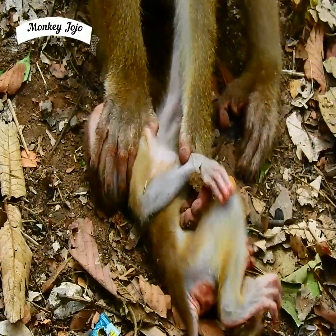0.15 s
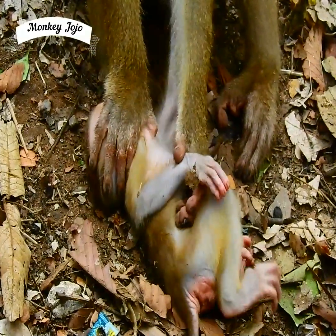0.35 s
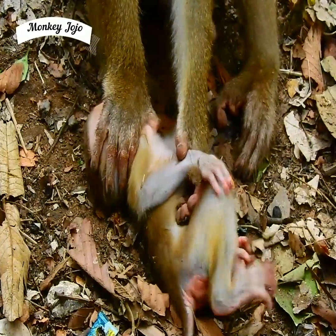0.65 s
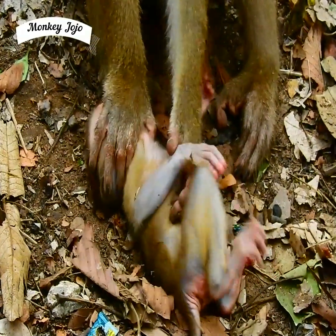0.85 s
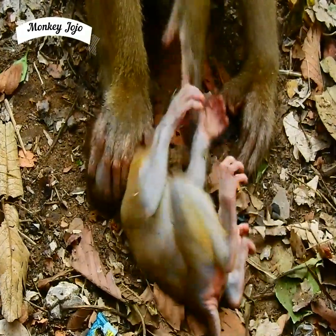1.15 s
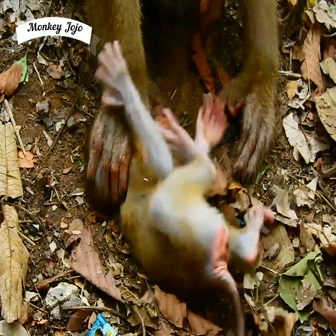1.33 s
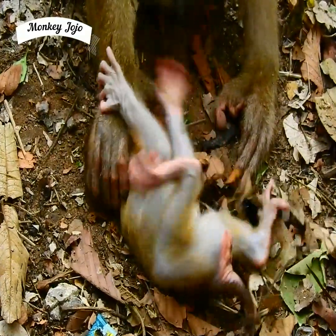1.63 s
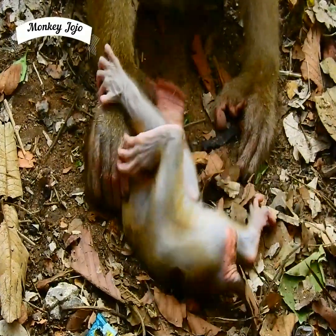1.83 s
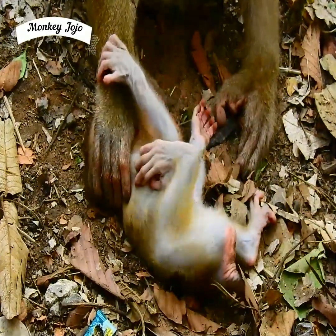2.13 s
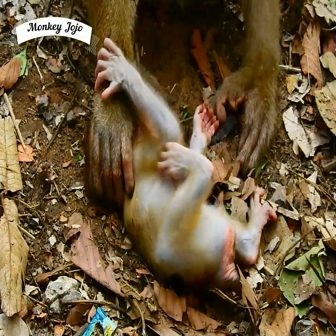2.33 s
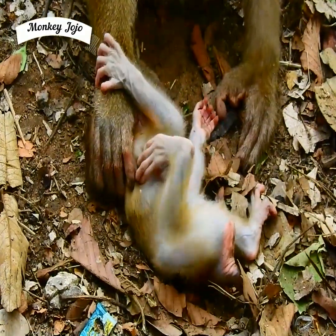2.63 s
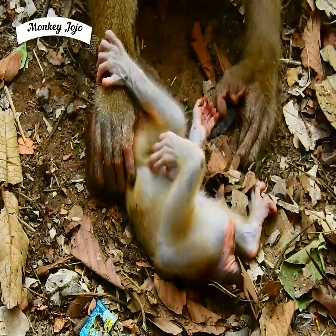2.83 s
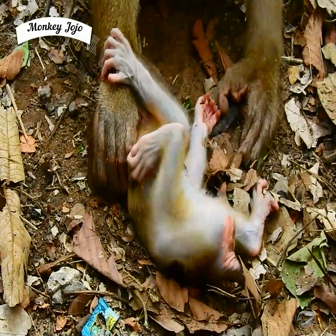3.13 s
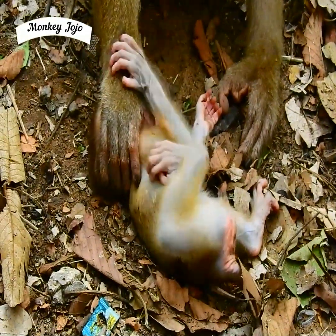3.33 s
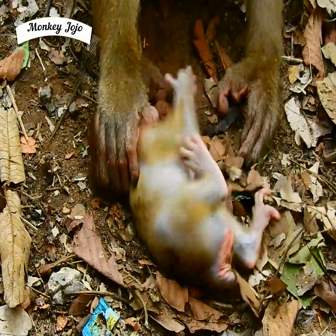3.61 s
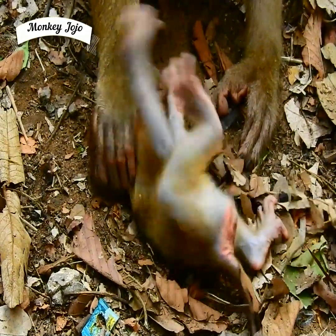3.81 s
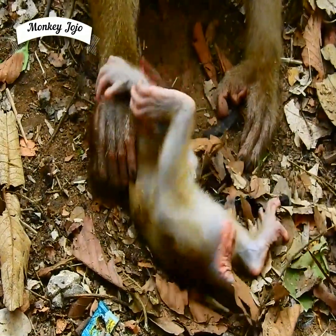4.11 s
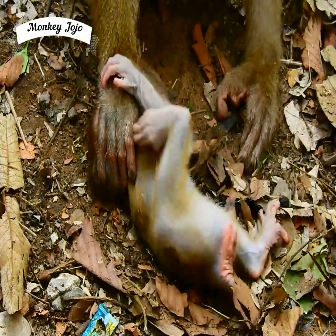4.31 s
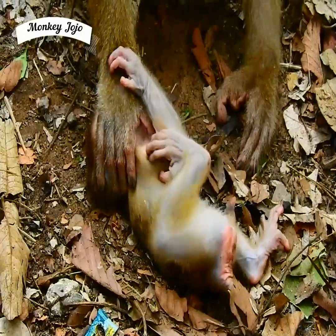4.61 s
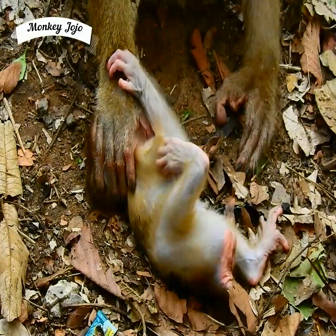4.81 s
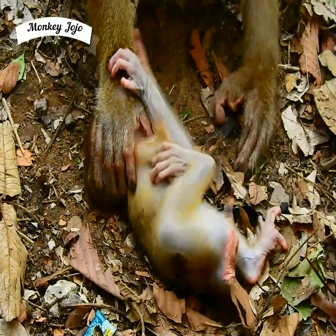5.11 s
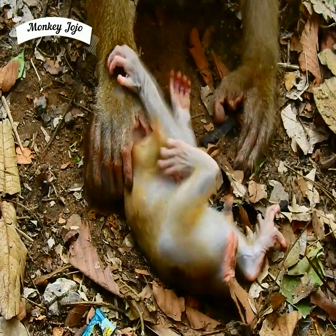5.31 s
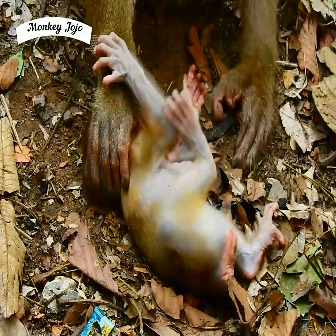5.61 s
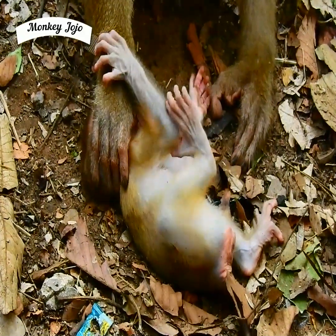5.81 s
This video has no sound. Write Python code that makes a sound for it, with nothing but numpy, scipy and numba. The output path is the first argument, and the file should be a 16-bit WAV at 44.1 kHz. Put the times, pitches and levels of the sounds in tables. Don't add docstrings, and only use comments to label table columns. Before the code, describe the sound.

A young monkey close by shrieks in ragged, piercing bursts that thin into wavering whistles, over low rumble and insect hiss outdoors.

```python
import sys
import numpy as np
from scipy import signal
from scipy.fft import rfft, irfft, next_fast_len
from scipy.io import wavfile
from scipy.ndimage import uniform_filter1d, minimum_filter1d, map_coordinates
from numba import njit

SR = 44100
rng = np.random.default_rng(int(sys.argv[2]) if len(sys.argv) > 2 else 0)


def master(y):
    cut = np.clip(np.atleast_2d(y).T, -1, 1)
    pcm = np.round(cut * 32767)
    wavfile.write(sys.argv[1], SR, pcm.astype(np.int16))


def boost(x):
    u = np.asarray(x, float) / 20
    return 10 ** u


N = 262395
T = np.arange(N) / SR


def unit(x):
    return x / np.sqrt(np.mean(x ** 2) + 1e-20)


def along(points, hz):
    f, v = np.transpose(points)
    return np.interp(np.log(hz + 1), np.log(f + 1), v)


def turns(hz):
    return 2 * np.pi * np.cumsum(hz) / SR


def wobble(rate):
    coarse = T[::16]
    knots = rng.standard_normal(int(N * rate / SR) + 4)
    return np.interp(T, coarse, map_coordinates(knots, [coarse * rate]))


def calls(tables, fade, lead=0, rise=0.0018):
    early = [np.vstack([[c[0][0] - lead - 1e-3, *c[0][1:]], c]) for c in tables]
    s, *cols = np.transpose(np.vstack(early))
    gate = 0
    for c in early:
        opening = (T - c[0][0]) / rise
        closing = (c[-1][0] - T) / fade
        gate = gate + np.clip(np.minimum(opening, closing) + 1, 0, 1)
    return [np.minimum(gate, 1)] + [uniform_filter1d(np.interp(T, s, c), size=110) for c in cols]


def filtered(x, response):
    m = next_fast_len(N + SR // 2)
    return irfft(rfft(x, m) * response(np.fft.rfftfreq(m, 1 / SR)), m)[..., :N]


def resonant(x, modes, order=2):
    def tube(f):
        total = 0
        for k, (centre, width, db) in enumerate(modes):
            band = 1j * f * width
            total = total + (-1) ** k * boost(db / order) * band / (centre * centre - f * f + band)
        return total
    return unit(filtered(x, lambda f: tube(f) ** order))


@njit
def moving(x, hz, width_hz, rate):
    y = np.zeros(len(x))
    r = np.exp(-np.pi * width_hz / rate)
    for i in range(2, len(x)):
        y[i] = x[i] - x[i - 2] + 2 * r * np.cos(2 * np.pi * hz[i] / rate) * y[i - 1] - r * r * y[i - 2]
    return y


def cavity(x, hz, width_hz):
    return unit(moving(moving(x, hz, width_hz, SR), hz, width_hz, SR))


# t/s, pulse rate f/Hz, level/dB of lowest partials, firmness 0-1
LOCKED = [
    [(1.33, 810, -50, .4), (1.385, 870, -50, .4)],
    [(1.675, 880, -48, .4), (1.71, 930, -44, .65), (1.73, 955, -42, .9), (1.755, 960, -44, .85)],
    [(1.82, 930, -52, .4), (1.865, 850, -46, .55)],
    [(4.14, 720, -58, .45), (4.165, 805, -54, .8), (4.19, 880, -54, .75)],
    [(4.27, 1640, -65, .6), (4.3, 1140, -65, .5), (4.33, 780, -65, .4)],
    [(5.345, 1090, -37, .8), (5.37, 1110, -33, .8), (5.39, 1100, -36, .7)],
    [(5.705, 880, -42, .5), (5.73, 810, -52, .45), (5.75, 1090, -65, .6), (5.78, 1130, -65, .4)],
]


def folds():
    gate, lock_hz, buzz_db, firm = calls(LOCKED, fade=0.00824)
    loose = 1 - gate * firm
    stagger = loose ** 2 * (.1 * wobble(300) + .16 * wobble(45)) + .012 * wobble(60)
    beat = turns(lock_hz * np.exp(stagger))
    slap = np.exp(16 * (np.cos(beat) - 1)) * boost(loose * 2.0 * wobble(500))
    hiss = rng.standard_normal(N) * (.5 + np.sqrt(slap))
    partials = np.sin(beat) + .5 * np.sin(2 * beat) + 0.2 * np.sin(3 * beat)
    buzz = gate * boost(buzz_db + 3.2 * wobble(60)) * partials
    source = unit(np.diff(slap, prepend=0)) + .42 * loose * unit(hiss)
    return source, (1 - loose) * np.cos(beat), buzz


def flicker(hz, beat):
    phase = turns(hz * (1 + .035 * wobble(45) + .018 * wobble(500))) + .7 * beat
    catch = np.clip(wobble(40) + .35, .05, 1.6)
    return unit(catch * np.sin(phase)), unit(catch ** 2 * np.sin(2 * phase))


MOUTH_HZ, MOUTH_WANDERS = 6450, .035
MOUTH_HOLDS, MOUTH_CLOSES_DB = 0.57, 6
THROAT_TIGHT_HZ, TIGHTEN_S, THROAT_SAG_DB_PER_S = 4680, 0.059, 24
THROAT_LASTS_S, THROAT_DIES_DB_PER_S, THROAT_BURST_DB = 0.12, 300, 4
TOP_DB, TOP_BURST_DB, BURST_S, TOP_GROWS_DB_PER_S = -21.5, 5, 0.016, 39


def shape(s, length, mouth_db, throat_db, throat_hz):
    age = np.linspace(0, length, num=12)
    burst = np.exp(-age / BURST_S)
    closing = np.clip(age / length - MOUTH_HOLDS, 0, 1) / (1 - MOUTH_HOLDS)
    mouth = mouth_db - MOUTH_CLOSES_DB * closing
    throat = throat_db + THROAT_BURST_DB * burst - THROAT_SAG_DB_PER_S * age
    throat = throat - THROAT_DIES_DB_PER_S * np.maximum(age - THROAT_LASTS_S, 0)
    top = TOP_DB + TOP_BURST_DB * burst + TOP_GROWS_DB_PER_S * age
    hz = THROAT_TIGHT_HZ + (throat_hz - THROAT_TIGHT_HZ) * np.exp(-(age / TIGHTEN_S) ** 2)
    mouth_hz = MOUTH_HZ * (1 + MOUTH_WANDERS * rng.standard_normal(len(age)))
    return np.transpose([s + age, mouth, throat - mouth, top, hz, mouth_hz])


# t/s, length/s, mouth level/dB, throat level/dB, throat resonance at the start f/Hz
SCREECHES = [(0.0, .008, -26, -35.5, 4600), (0.168, 0.04, -16, -25, 3300), (0.259, 0.018, -10, -18, 4270),
             (0.443, 0.036, -21.5, -24, 4100), (0.514, .022, -10.5, -16, 4086),
             (0.711, 0.054, -12.5, -17.5, 3500), (0.769, 0.084, -7, -15.5, 3565),
             (0.988, 0.15, -9, -12.5, 3570), (1.279, 0.16, -7.5, -11, 3744),
             (1.459, 0.044, -13.5, -19.5, 4900), (1.623, 0.25, -9.5, -13.5, 3206),
             (3.11, .055, -33.5, -57, 3500), (3.315, .04, -14, -22.5, 2900), (3.398, .01, -21.5, -37, 5000),
             (3.546, 0.02755, -14, -18, 2908), (3.615, .05, -8, -15.5, 4000),
             (3.807, 0.14, -7, -13.5, 3100), (4.073, 0.14, -5.5, -12, 3285), (5.168, 0.043, -54, -52, 2800),
             (5.378, 0.1227, -24, -33.5, 3970), (5.712, .04, -6.5, -49, 5000),
             (5.762, 0.037, -40, -20.5, 4900), (5.916, .031, -30, -47, 4500)]
# f/Hz, width/Hz, level/dB
MOUTH = [(5500, 1100, -4), (6450, 800, 0), (7600, 900, -4)]
# f/Hz, width/Hz, level/dB
TOP = [(9000, 3000, 0), (12500, 4000, -12)]


def screech(source, beat):
    shapes = [shape(*row) for row in SCREECHES]
    mouth_open = calls(shapes, fade=0.013, lead=0, rise=.0045)[0]
    voiced, mouth_db, throat_db, top_db, throat_hz, mouth_hz = calls(shapes, fade=0.0093, lead=.009, rise=.009)
    shut = uniform_filter1d(1. * (voiced > 0) - mouth_open, size=500, origin=-240)
    throat_hz = throat_hz * (1 - .2 * shut)
    low_tone, low_octave = flicker(throat_hz, beat)
    high_tone, high_octave = flicker(mouth_hz, beat)
    ringing = cavity(source, throat_hz, width_hz=2000)
    ringing = cavity(ringing, throat_hz * (1 + .06 * wobble(60)), width_hz=1700)
    throat = .9 * ringing + .35 * low_tone
    mouth = .8 * resonant(source, MOUTH) + .5 * high_tone
    top = .85 * resonant(source, TOP) + .4 * low_octave + .06 * high_octave

    def patch():
        return boost(2.6 * wobble(50) + 2.2 * wobble(130))
    upper = mouth_open * (patch() * mouth + boost(top_db) * patch() * top)
    lower = voiced ** 2 * boost(throat_db - 2 + 1.83 * shut) * patch() * throat
    return boost(mouth_db - 3.5) * (upper + lower)


# octave level/dB re the tone, then points
# of t/s, pitch f/Hz, level/dB
WHISTLES = [
    (-19, [(1.89, 6800, -11), (1.9, 6810, -15), (1.955, 6700, -14), (1.97, 6330, -13), (2.035, 6130, -14), (2.085, 6010, -14), (2.165, 5705, -20.5), (2.275, 5480, -17.5), (2.335, 5760, -16)]),
    (-21, [(4.2, 5790, -8), (4.23, 5350, -15.5), (4.254, 6160, -8.5), (4.337, 6110, -14.5), (4.371, 5280, -18.5), (4.485, 5380, -16), (4.517, 5900, -14.5), (4.597, 5870, -13.5), (4.645, 5330, -15.5)]),
    (-15, [(5.575, 5415, -11.5), (5.611, 5320, -18.5), (5.635, 6140, -13), (5.685, 6130, -18.5), (5.705, 6600, -10)]),
            (-28, [(1.035, 4900, -12.5), (1.052, 5700, -25), (1.057, 6600, -15)]),
    (-22, [(2.343, 6200, -39), (2.353, 6450, -8.5), (2.365, 6350, -26)]),
    (-24.5, [(1.066, 3950, -17.5), (1.12, 4276, -18), (1.14, 5160, -12), (1.163, 4890, -18.5)]),
    (-34, [(1.4, 5450, -20), (1.414, 4823, -13.5), (1.432, 6502, -13), (1.5, 4376, -14)]),
    (-45, [(1.8, 7120, -12.5), (1.87, 7250, -14)]),
    (-36, [(3.925, 4200, -15.5), (3.955, 4350, -14)]),
    (-27, [(4.65, 5250, -5.5), (4.662, 4650, -30)]),
    (-27, [(5.71, 6610, -7), (5.769, 5020, -18), (5.8, 5130, -17.5)]),
    (-43, [(5.354, 6360, -32.5), (5.385, 6980, -22)]),
    (-12, [(5.435, 1950, -38.5), (5.485, 2475, -30.5), (5.52, 3857, -15.5), (5.546, 4000, -15), (5.57, 5000, -15.5)]),
]
# t/s, rise f/Hz, fall time/s
JOLTS = [
    (2.003, 250, .02),
    (2.07, 350, .008),
    (2.105, 280, .03),
    (2.25, 350, .012),
    (2.3, 250, .015),
    (4.258, 680, .02),
    (4.435, 1050, .014),
    (4.517, 520, .03),
]
JOLT_RISE_S, JOLT_DB_PER_KHZ = .018, 5
OCTAVE_DB_PER_KHZ = -6.5


def sung():
    tables = [[(*row, octave_db) for row in c] for octave_db, c in WHISTLES]
    tables = sorted(tables, key=lambda c: c[0][0])
    gate, hz, db, octave_db = calls(tables, fade=0.0076)
    jolt = 0
    for s, up, fall in JOLTS:
        rise = np.clip(1 + (T - s) / JOLT_RISE_S, 0, 1)
        jolt = jolt + up * rise * np.exp(-np.maximum(T - s, 0) / fall)
    hz = hz + uniform_filter1d(jolt, size=110)
    db = db + JOLT_DB_PER_KHZ * jolt / 1000
    octave_db = db + octave_db + OCTAVE_DB_PER_KHZ * (hz - 5800) / 1000 + 4 * wobble(30)
    return gate, hz, db, octave_db


def whistle(beat):
    gate, hz, db, octave_db = sung()
    rough = 0.00365 + 0.01104 * (hz < 4800)
    phase = turns(hz * (1 + 0.01048 * wobble(55) + rough * wobble(300))) + 0.32 * beat
    tone = boost(db) * np.sin(phase)
    half_step = boost(db - 45 + 8 * wobble(30)) * np.sin(1.5 * phase)
    third = .07 * np.clip((4400 - hz) / 2000, 0, 1) * np.sin(3 * phase)
    overtones = boost(octave_db) * (np.sin(2 * phase) + third)
    air = rng.standard_normal(N)
    breath = cavity(air, hz, width_hz=2250) + 0.35 * cavity(air, 2.07 * hz, width_hz=1100)
    breath = boost(db - 21.5 + 2.1 * wobble(25.32)) * breath
    return gate * boost(2.2 * wobble(60)) * (np.sqrt(2) * (tone + half_step + overtones) + breath)


# t/s, peak level/dB, resonance f/Hz, length/s, voice 0-1 (full at .7)
GRUNTS = [(0.046, -36, 920, 0.033, 0.06), (0.169, -28.5, 1576, 0.037, 0.061), (0.342, -33, 729, 0.09, 0.18),
          (0.428, -28, 1490, 0.053, 0.056), (0.709, -28.5, 1427, 0.031, 0.17),
          (1.225, -33, 1068, 0.03, 0.17), (2.63, -35.5, 1276, 0.029, 0.86), (2.898, -35, 1133, 0.052, 0.89),
          (2.975, -44, 618, 0.03, 0.64), (3.096, -35, 1458, 0.049, 0.62), (3.291, -27, 1290, 0.054, 0.11),
          (3.536, -28, 1335, 0.041, 0.078), (3.63, -35, 876, 0.029, 0.37),
          (3.797, -33.5, 1524, 0.052, 0.15), (4.09, -34, 1284, 0.035, 0.13), (5.14, -29.5, 956, 0.04, 0.18),
          (5.179, -30.5, 945, 0.024, 0.22), (5.38, -28.5, 1366, 0.042, 0.17)]


def grunts():
    out = np.zeros(N + SR)
    t = np.arange(SR // 8) / SR
    for s, db, hz, length, voice in GRUNTS:
        swell = np.sin(np.pi * np.clip(t / length, 0, 1)) ** 1.06
        air = rng.standard_normal(len(t))
        hum = np.clip(voice, 0, .7) * np.cos(2 * np.pi * hz * t * (1 - 3.58 * t))
        low = signal.lfilter(*signal.iirpeak(hz, 3.5, SR), air + hum)
        wide = signal.lfilter(*signal.butter(2, [750, 3600], "band", fs=SR), air)
        puff = signal.lfilter(*signal.butter(3, 3800, fs=SR), 1.3 * low + .45 * wide)
        out[round(s * SR):][:len(t)] += boost(db + 8) * swell * puff
    return out[:N]


# t/s, second partial f/Hz, level/dB
COO = [
    (3.36, 1617, -30.5),
    (3.44, 1667, -43),
    (3.5, 1710, -29.5),
    (3.68, 1754, -44),
    (3.85, 1880, -32),
]


def coo():
    gate, hz, db = calls([COO], fade=0.022, rise=.02)
    phase = turns(hz * (1 + .008 * wobble(60)))
    second = boost(db) * np.sin(phase)
    third = boost(db - 12) * np.sin(1.5 * phase)
    return gate * boost(6 * wobble(25) - 5) * (second + third)


# f/Hz, t60/s
TREES = [(1000, 0.37), (4000, 0.35), (6500, 0.41), (12000, 0.26)]


def trees(x):
    out = np.zeros((2, N + SR))
    half = SR // 2
    for start in range(0, N, half):
        hz, t, z = signal.stft(rng.standard_normal((2, half)), SR, nperseg=256)
        decay = boost(-60 * t / along(TREES, hz)[:, None])
        tail = signal.istft(z * decay, SR, nperseg=256)[1]
        stereo = np.array([tail[0] + 0.66 * tail[1], tail[0] - 0.4 * tail[1]])
        stereo = stereo / np.linalg.norm(tail[0])
        wet = signal.fftconvolve(x[None, start:start + half], stereo, axes=1)
        out[:, start:start + wet.shape[1]] += wet
    return out[:, :N]


# f/Hz, left-right likeness 0-1
ALIKE = [(100, 1), (1000, 0.9), (4000, 0.5), (12000, 0.067)]


def rush(spectrum):
    def turn(hz):
        return np.arccos(np.clip(along(ALIKE, hz), -1, 1)) / 2

    def response(hz):
        return boost(along(spectrum, hz)) * [np.cos(turn(hz)), np.sin(turn(hz))]
    mid, side = filtered(rng.standard_normal((2, N)), response)
    return unit(np.array([mid + side, mid - side]))


# t/s, level/dB
ROAD = [(0.0, -34.5), (0.86, -31.5), (2.14, -36.5), (2.45, -28), (2.88, -37.5), (3.08, -26.5),
        (3.52, -28.5), (3.59, -18), (3.66, -26), (4.39, -29.5), (5.6, -34), (5.95, -27.5)]
# f/Hz, level/dB per Hz
RUMBLE = [(12, -62), (20, -82), (34, -12), (81, 2.5), (129, -4), (161, -3.5), (252, -13), (330, -27.5),
          (430, -26.5), (730, -120)]
# f/Hz, level/dB per Hz
AIR = [(190, -85), (330, -4), (681, -10), (750, -14.5), (813, -11), (1480, -16), (1910, -14.5),
       (2470, -18.5), (3150, -15.5), (3410, -23), (4780, -11.5), (6900, -13.5), (10400, -35), (15500, -39)]
AIR_DB = -42.5
DUCK_AT, DUCK_STEEP = 0.2, 1.8


def background(cries, harsh):
    def loud(x):
        return np.sqrt(np.abs(uniform_filter1d(x ** 2, size=3000, origin=1200)))
    s, db = np.transpose(ROAD)
    rumble = boost(np.interp(T, s, db) + 1.2 * wobble(12)) * rush(RUMBLE) * boost([[.6], [-.6]])
    rumble = rumble / (1 + (loud(harsh) / DUCK_AT) ** DUCK_STEEP)
    duck = 1 / (1 + loud(cries) / 0.85)
    hiss = boost(AIR_DB + 0.18 * wobble(4.82) + 2.4 * wobble(24)) * rush(AIR)
    return rumble + duck * hiss


def scene():
    source, beat, buzz = folds()
    harsh = screech(source, beat)
    cries = harsh + whistle(beat) + buzz + grunts()
    lean = .5 * wobble(3)

    def ground(hz):
        return hz / (hz + 9000) * np.exp(-2j * np.pi * hz * .0021)
    bounce = boost(0.5) * filtered(cries, ground)
    far = coo()
    smear = .65 + .75 * wobble(450)
    direct = cries * boost([lean, -lean]) + bounce * [[1], [-1]] + far
    echo = boost(-8.0) * trees((cries + far) * smear)
    return direct + echo + background(cries, harsh)


def top_cut(x):
    return signal.sosfilt(signal.butter(12, 15700, fs=SR, output="sos"), x)


def record(dry):
    need = 1 / np.maximum(np.abs(dry).max(axis=0) / .97, 1)
    gain = uniform_filter1d(minimum_filter1d(need, size=129), size=128)
    mix = filtered(dry * gain, lambda hz: hz < 15700)
    return top_cut(mix)


dry = scene()
out = record(dry)
master(out)
```